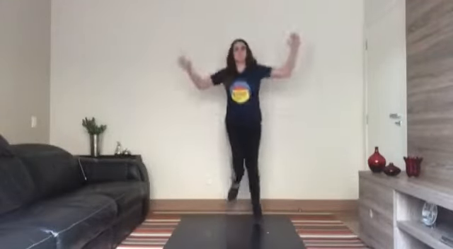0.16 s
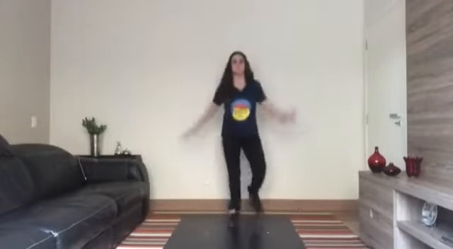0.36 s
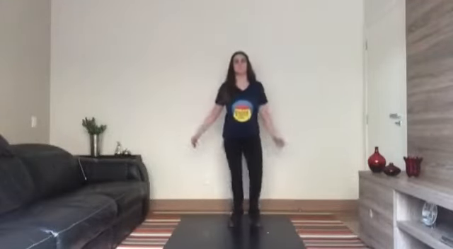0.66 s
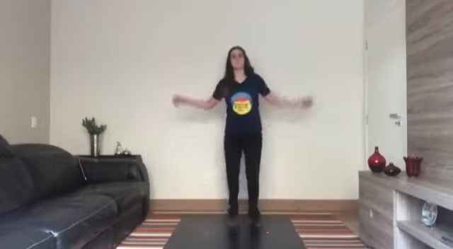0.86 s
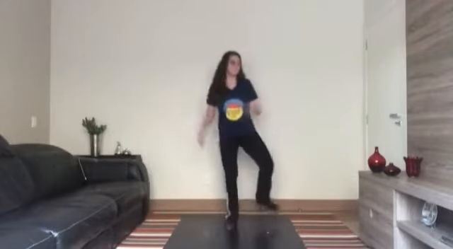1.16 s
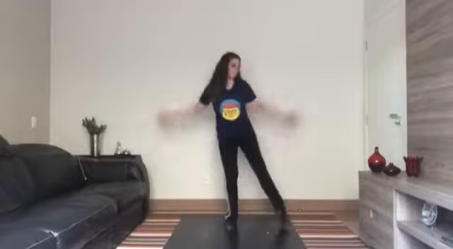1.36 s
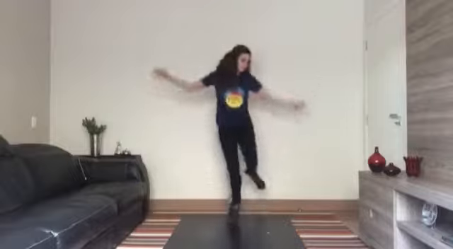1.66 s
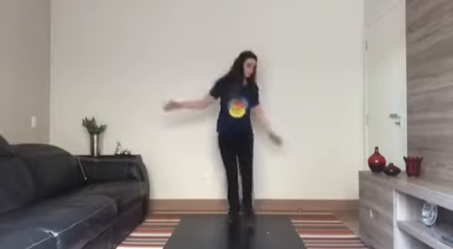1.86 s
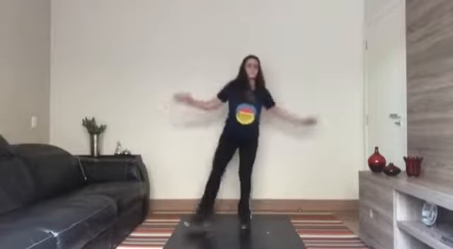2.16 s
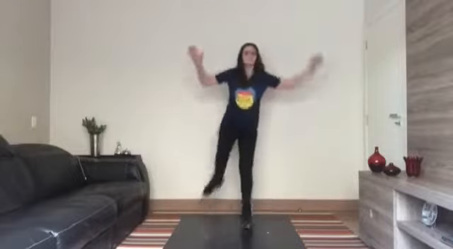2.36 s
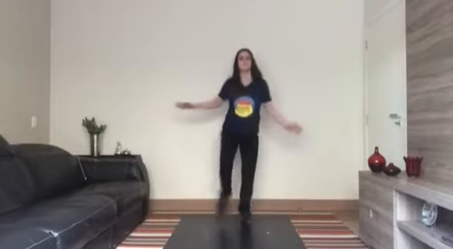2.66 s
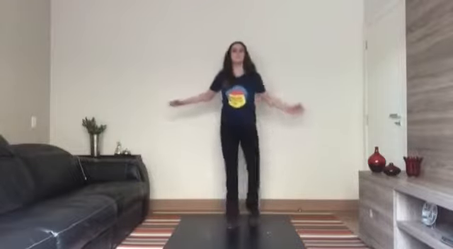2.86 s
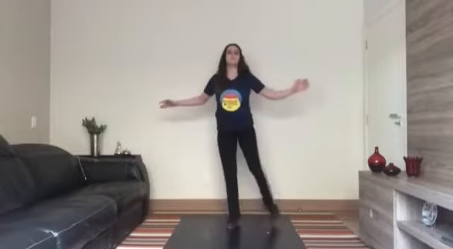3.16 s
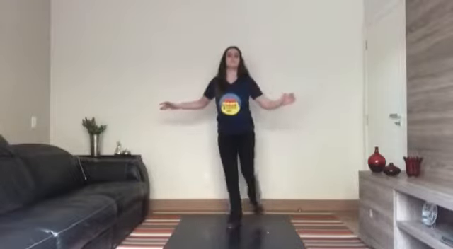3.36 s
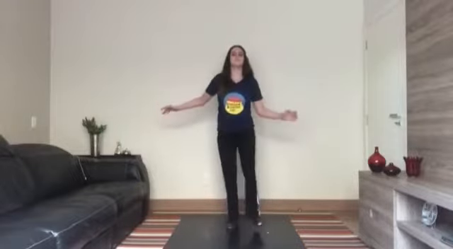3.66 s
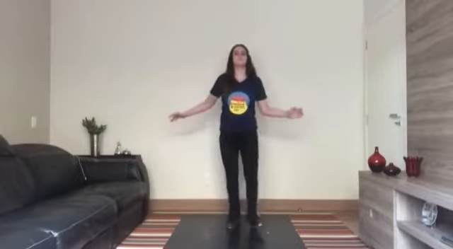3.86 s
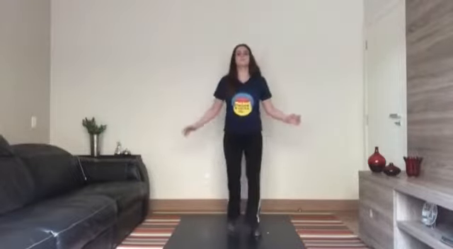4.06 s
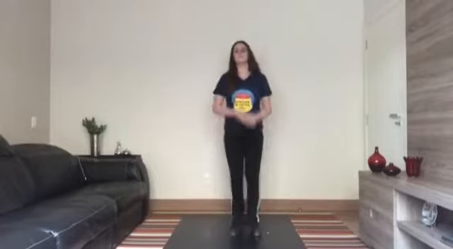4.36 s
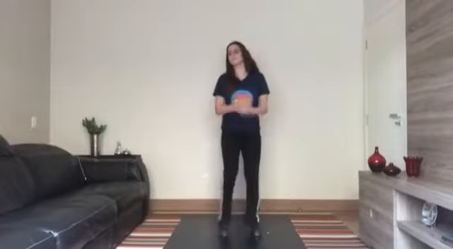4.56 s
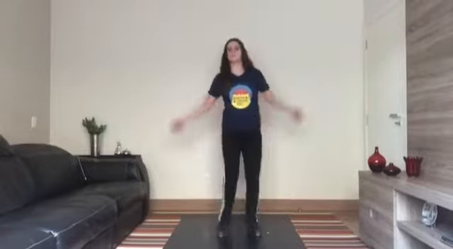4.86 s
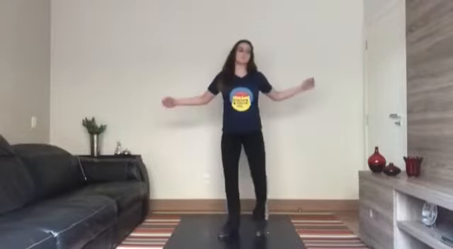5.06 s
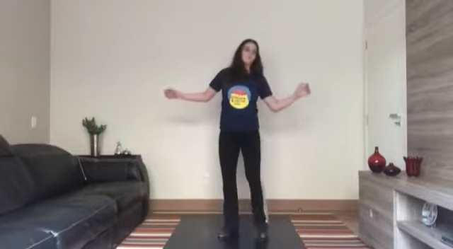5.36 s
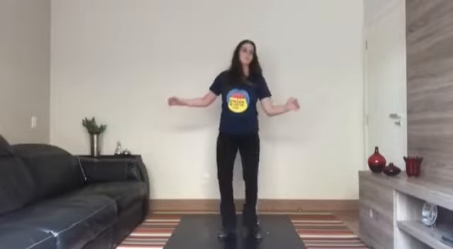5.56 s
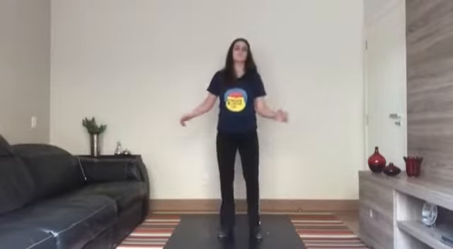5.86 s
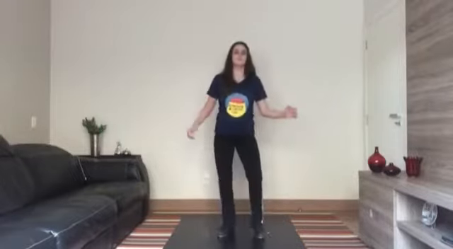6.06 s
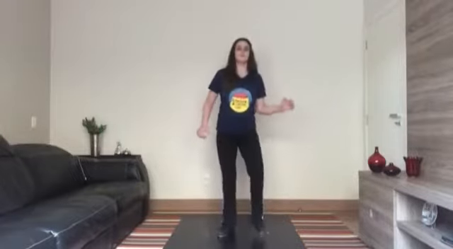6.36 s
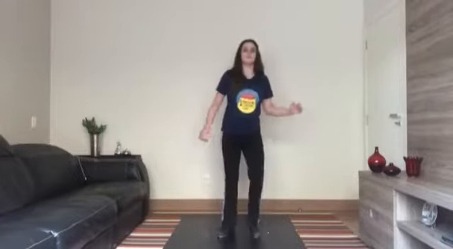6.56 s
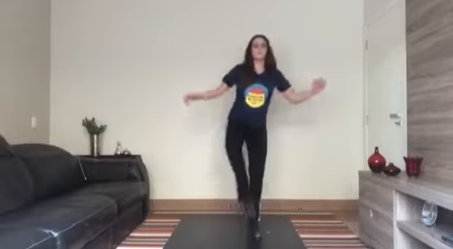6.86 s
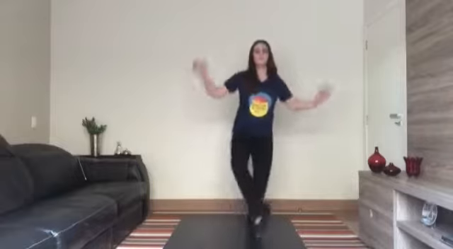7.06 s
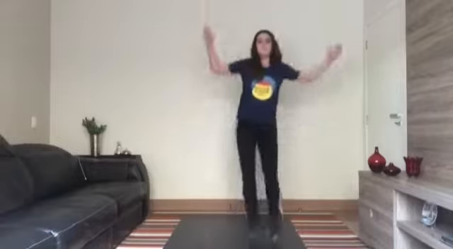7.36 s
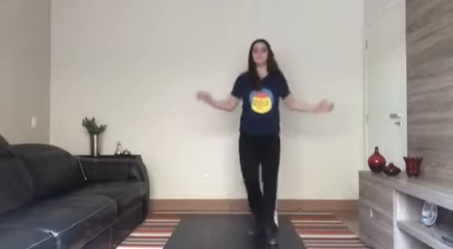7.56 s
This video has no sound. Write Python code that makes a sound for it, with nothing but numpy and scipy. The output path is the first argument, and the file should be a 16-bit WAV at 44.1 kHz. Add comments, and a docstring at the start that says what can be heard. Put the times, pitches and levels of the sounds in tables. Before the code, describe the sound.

A tap dancer in a bare living room strikes a wooden board with metal-plated shoes. Irregular opening taps and a heavy stomp lead to a rapid, steady run, which grows lighter, then ends in firm knocks. After a brief gap come sparser, softer taps and a few strong final landings. One microphone a few metres away catches plenty of room echo over a faint hush and low hum.

```python
"""A bare, echoing living room: metal-plated shoes tap on a wooden board, a few metres from one microphone.
Each tap briefly rings the board, the sole and the metal plate, built from resonances with random variation.
The room answers with a few early echoes and a long dying wash of noise, with standing waves in the bass.
Heavy landings also swing the floor in decaying low tones.
Faint filtered noise and a low machine hum stay underneath."""
import sys
import numpy as np
from scipy import signal
from scipy.fft import rfft, irfft
from scipy.io import wavfile
from scipy.ndimage import uniform_filter1d

SR = 44100
rng = np.random.default_rng(int(sys.argv[2]) if len(sys.argv) > 2 else 0)


def bounce(signal):
    """Save signal as a 16-bit WAV file at the path given by the first command-line argument."""
    frames = np.transpose(np.atleast_2d(signal))
    limited = np.clip(frames, -1, 1)
    pcm = np.round(limited * 32767).astype(np.int16)
    wavfile.write(sys.argv[1], SR, pcm)


N = 339570  # length in samples
TAP_SIZE = 32768  # samples in one room answer


def gain_of(db):
    """Turn decibels into an amplitude factor."""
    return 10 ** (np.asarray(db) / 20)


def read(points, hz):
    """Read a curve of (f/Hz, value) points, evenly spread over log frequency."""
    f, value = np.transpose(points)
    return np.interp(np.log(hz + 1), np.log(f + 1), value)


def add(mix, s, sound):
    """Add a sound to the mix, starting at s seconds."""
    part = mix[round(s * SR):][:len(sound)]
    part += sound[:len(part)]


def smooth_noise(shape, size, axis=-1):
    """Random values averaged with their neighbours, scaled back to their first spread."""
    return uniform_filter1d(rng.standard_normal(shape), size, axis) * np.sqrt(size)


def causal(power):
    """Spectrum of the shortest click that has this power spectrum (minimum phase)."""
    cepstrum = irfft(np.log(power + 1e-14) / 2)
    half = len(cepstrum) // 2
    cepstrum[1:half] *= 2
    cepstrum[half + 1:] = 0
    return np.exp(rfft(cepstrum))


def ring(modes, hz, luck):
    """Power spectrum of steep resonances at a fixed total; the spot struck favours some modes."""
    power = 0
    for k, (f, width, db) in enumerate(modes):
        mode_hz = f * (1 + .015 * luck[k])
        mode_db = db + 1.5 * luck[k + 6]
        off = (hz - mode_hz) / width
        power = power + gain_of(2 * mode_db) / (1 + 1.2 * off ** 2) ** 3
    return power / (2 * power.mean())


def plate_ping(plate_hz):
    """The metal plate heard straight: two tones that swell and die within milliseconds."""
    t = np.arange(600) / SR
    pair = np.sin(2 * np.pi * plate_hz * t) + 0.46 * np.sin(2 * np.pi * 1.235 * plate_hz * t)
    return pair * (t / 0.00068) * np.exp(1 - t / 0.0012)


def board_rap(knock_hz):
    """The board's knock heard straight: a short tone that starts sharp and settles."""
    t = np.arange(600) / SR
    bent_time = t + 0.00053 * (1 - np.exp(-t / 0.0011))
    return np.sin(2 * np.pi * knock_hz * bent_time) * np.exp(-t / .004)


# What each part rings with: f/Hz, width/Hz, level/dB (within its part)
BOARD_BOOM = [(141, 32, -20), (165, 20, -9), (220.4, 19, -7.5), (263.2, 90, 0), (363, 51, -5.5)]
BOARD_KNOCK = [(463, 210, 3), (652, 133, 2), (770, 230, 4.5), (936, 370, 3), (1152, 560, -4)]
SOLE_SLAP = [(1660, 1030, -1.4), (1914, 860, -1), (2440, 550, 0.12)]
UPPER_PLATE = [(5030, 940, 3), (6190, 980, -2)]
EDGE_TICK = [(6940, 2700, 14.4), (10480, 1270, 2.5)]
# Side rings of the plate: f as a ratio to the plate's pitch, width/Hz, level/dB
PLATE_SIDES = [(.86, 550, -5.5), (1.13, 490, -7)]
KNOCK_HZ, KNOCK_LEAN_DB = 806, 34  # usual knock pitch; lean in dB per octave squared
UPPER_DB, UPPER_FROM_SLAP = 1, 0.43  # upper plate ring: 43 % of the way from tick to slap level, plus 1 dB
PARTIALS_DB = 2


def blow(tap, luck):
    """The strike: board, sole and plate resonances add their power into one short click."""
    _, plate_db, plate_hz, tick_db, slap_db, knock_db, knock_hz, boom_db = tap
    hz = np.fft.rfftfreq(8192, 1 / SR)
    # a knock above the usual pitch favours the upper modes, one below it the lower
    lean_db = KNOCK_LEAN_DB * np.log2(knock_hz / KNOCK_HZ)
    knock = [(f, width, db + lean_db * np.log2(f / KNOCK_HZ)) for f, width, db in BOARD_KNOCK]
    knock.append((knock_hz, 350, -1.5))
    plate = [(plate_hz, 990, 0)]
    plate += [(ratio * plate_hz, width, db) for ratio, width, db in PLATE_SIDES]
    upper_db = tick_db + UPPER_DB + UPPER_FROM_SLAP * (slap_db - tick_db)

    parts = (BOARD_BOOM, knock, SOLE_SLAP, plate, UPPER_PLATE, EDGE_TICK)
    levels = (boom_db, knock_db, slap_db, plate_db, upper_db, tick_db)
    power = sum(gain_of(2 * db) * ring(modes, hz, u) for modes, db, u in zip(parts, levels, luck))
    # many small partials make the spectrum uneven, less so in the bass
    partials = smooth_noise(len(hz), 12) * hz / (hz + 400)
    return irfft(causal(power * gain_of(2 * PARTIALS_DB * partials)))


# Straight sound against the wash: f/Hz, level/dB
STRAIGHT = [(200, -18), (800, -23), (3000, -14.5), (9000, -18.5)]


def straight_sound(count, hz):
    """The plate meets the wood in tiny steps: a very short burst of noise for each tap."""
    t, contact_s = np.arange(400) / SR, 0.00037
    chatter = rng.standard_normal((count, 400)) * t * np.exp(-t / contact_s)
    chatter /= np.linalg.norm(chatter, axis=1)[:, None]
    return np.sqrt(SR / 10) * gain_of(read(STRAIGHT, hz)) * rfft(chatter, 2 * TAP_SIZE)


# Standing waves between the walls: f/Hz, level/dB (among themselves)
STANDING = [(176, -7.5), (223, 3), (284, 5), (314, -1), (372, -1.5), (663, -5), (790, -3.5)]


def standing_waves(count):
    """Tones the room itself rings with, fading together; each tap excites them differently."""
    t = np.arange(TAP_SIZE) / SR
    f, db = np.transpose(STANDING)
    strength = 0.63 + 0.88 * rng.standard_normal((count, len(f)))
    # each tap gets its own small random detuning of these tones
    pitch = f * (1 + .02 * rng.standard_normal((count, len(f))))
    amplitude = 0.041 * gain_of(db) * strength
    tones = [a @ np.sin(2 * np.pi * p[:, None] * t) for a, p in zip(amplitude, pitch)]
    return np.array(tones) * np.exp(-t / 0.26)


# How fast the main wash dies: f/Hz, time to fall 60 dB/s
WASH_DECAY = [(130, 0.56), (260, 0.64), (700, 0.73), (1800, 0.85), (4500, 0.69), (8000, 0.53),
              (12000, 0.41)]
# How slowly the wash builds: f/Hz, time constant/s
WASH_BUILD = [(250, 0.007), (800, 0.0028), (3000, 0.0083), (9000, 0.0069)]
ALIKE, PATCHY_DB = 0.51, 2.0  # share of noise common to all taps; unevenness of the wash
LATE_DB, LATE_STRETCH = -18, 2.65  # the second slope: its level and how many times longer it lasts
LATE_LIFT_DB = 0.5  # treble lift of the second slope, per 5000 Hz
DIFFUSE_HZ, DIFFUSE_DB = 415, -1.5  # below this pitch the noise gets softer and smoother


def room_wash(count):
    """Noise that builds and dies band by band, like countless reflections, over the standing waves."""
    shared, own = rng.standard_normal(TAP_SIZE), rng.standard_normal((count, TAP_SIZE))
    noise = ALIKE * shared + np.sqrt(1 - ALIKE ** 2) * own
    hz, t, bands = signal.stft(noise, SR, nperseg=256)
    high = (1 / (1 + (DIFFUSE_HZ / (hz + 1)) ** 4))[:, None]
    bands = bands * gain_of(DIFFUSE_DB * (1 - high))
    bands = bands + signal.stft(standing_waves(count), SR, nperseg=256)[2]

    rise = 1 - np.exp(-t / np.maximum(read(WASH_BUILD, hz), .001)[:, None])
    fall_db = -60 * t / read(WASH_DECAY, hz)[:, None]
    # a quieter second slope dies more slowly, so the tail lingers
    late_db = LATE_DB + LATE_LIFT_DB * hz[:, None] / 5000 + fall_db / LATE_STRETCH
    shape = rise * np.hypot(gain_of(fall_db), gain_of(late_db))
    shape /= shape.max(1)[:, None]

    # louder and softer patches over neighbouring pitches and moments
    patches = uniform_filter1d(smooth_noise(bands.shape, 5, 1), 9, 2) * np.sqrt(9)
    bands = bands * shape * gain_of(high * PATCHY_DB * patches)
    return signal.istft(bands, SR, nperseg=256)[1][:, :TAP_SIZE]


# First surfaces, the far ones hard and favouring the treble: t/s, level/dB, lift above 5 kHz/dB
FIRST_ECHOES = [(.0048, 3, -9), (.0145, -12, 17.5), (.0175, -11, 20)]


def first_echoes(count, hz):
    """Delayed copies of the straight sound, with alternating sign; includes the straight path."""
    early = np.ones((count, len(hz)), complex)
    bright = 1 / (1 + (5000 / (hz + 1)) ** 4)
    luck = rng.standard_normal((count, len(FIRST_ECHOES), 2, 1))
    for k, (s, db, lift_db) in enumerate(FIRST_ECHOES):
        # each echo's delay varies slightly at random from tap to tap
        delay = s + 0.00049 * luck[:, k, 0]
        gain = gain_of(db + lift_db * bright + 2 * luck[:, k, 1])
        early += (-1) ** k * gain * np.exp(-2j * np.pi * hz * delay)
    return early


def room(count):
    """Spectrum of the room's answer to each tap: straight sound, first echoes and dying wash."""
    hz = np.fft.rfftfreq(2 * TAP_SIZE, 1 / SR)
    early = straight_sound(count, hz) * first_echoes(count, hz)
    return rfft(room_wash(count), 2 * TAP_SIZE) + early


# Taps: t/s, plate click level/dB, plate f/Hz, edge tick level/dB, sole slap level/dB,
# board knock level/dB, knock f/Hz, board boom level/dB
TAP_LIST = [(-0.15, -15.0, 3250, -25.5, -17.5, -9, 765, -15),
            (0.015, -27, 3030, -39.0, -21.0, -29.0, 780, -21),
            (0.141, -19.5, 3510, -32.0, -23, -25, 720, -19.5),
            (0.308, -19, 3600, -30, -19.0, -13, 840, -19.5),
            (0.466, -20, 3370, -28, -21.5, -16.0, 865, -21.5),
            (0.665, -18.5, 4450, -27.0, -28, -16.5, 700, -18.5),
            (1.108, -20.5, 3690, -25.0, -20.5, -11.5, 730, -18),
            (1.252, -20, 3330, -24.5, -18, -13.5, 810, -20), (1.402, -18, 3360, -23.5, -20, -15, 780, -21),
            (1.574, -23.5, 2960, -31, -23, -23.5, 774, -25),
            (1.694, -19, 3240, -28.5, -19.5, -15.5, 794, -23),
            (1.863, -23.5, 3750, -34.5, -20.5, -15, 950, -19.5),
            (2.034, -28.5, 3130, -35, -28.0, -29, 700, -25), (2.132, -22.5, 3260, -30, -19, -17, 720, -20),
            (2.267, -17.5, 3310, -26.0, -16, -13.5, 740, -17.0),
            (2.436, -23.5, 3600, -31, -25.0, -29, 830, -20.5),
            (2.574, -19, 3600, -25.5, -19, -16.5, 805, -24.5),
            (2.727, -29, 3300, -38.5, -26, -14.5, 895, -18.5),
            (2.868, -25.0, 3370, -38.0, -23.0, -19, 826, -24.5),
            (3.0, -25, 3190, -32, -24.5, -16.5, 804, -23.5),
            (3.138, -21.5, 3360, -25.5, -21.5, -15.5, 820, -25),
            (3.25, -25, 3430, -37.5, -35.0, -24, 745, -22.0),
            (3.42, -24.0, 3470, -32.5, -24, -13.5, 890, -22.5),
            (3.542, -28.5, 3970, -34.5, -55, -19, 765, -28.5),
            (3.724, -28.5, 2950, -41, -43, -27.0, 685, -26.5),
            (3.883, -31.5, 3240, -48, -46, -27.5, 640, -21),
            (3.994, -21.0, 3120, -22.5, -18, -23, 920, -13.5),
            (4.181, -19, 3850, -26.5, -18, -14.0, 805, -15.0),
            (4.653, -18, 3930, -28.5, -28.5, -15, 780, -18.5),
            (4.971, -27.5, 4080, -37.5, -36, -22, 790, -26.5),
            (5.16, -24.5, 3480, -26.5, -39, -17.5, 730, -20.0),
            (5.347, -28, 3600, -48.5, -36.5, -24, 756, -23.5),
            (5.504, -25.5, 3600, -36, -39.0, -24.5, 834, -20.5),
            (5.68, -29.0, 3300, -41.5, -42.0, -26, 715, -24.5),
            (5.813, -36.0, 3700, -41.5, -42, -28, 804, -24.5),
            (5.962, -30, 4340, -38.0, -35, -21.5, 810, -26.5),
            (6.103, -31, 3450, -37, -26.5, -31, 790, -33),
            (6.132, -25.5, 3140, -38.0, -41, -23.0, 783, -21.5),
            (6.601, -23.5, 3060, -31, -19.5, -20.5, 850, -18),
            (6.912, -28.5, 3230, -40.5, -26, -31.5, 770, -27),
            (6.975, -46, 3230, -50.0, -42, -30.5, 754, -20.5),
            (7.112, -28, 3520, -34.0, -22, -9.5, 910, -14),
            (7.426, -29.0, 3120, -36.0, -23, -23.0, 755, -25),
            (7.606, -24.5, 3400, -19.5, -20.5, -17, 794, -15),
            (7.634, -26, 4770, -29, -22.0, -10.5, 850, -17)]
PING_DB, RAP_DB, FLAT_DB = 1, 3, 18


def taps():
    """Every tap drives board, sole and plate with its own strengths, and the room answers."""
    out = np.zeros(N + SR)  # one spare second in front, for the tap before the start
    count = len(TAP_LIST)
    luck = rng.standard_normal((count, 6, 12))
    for tap, u, answer in zip(TAP_LIST, luck, room(count)):
        s, plate_db, plate_hz, _, _, knock_db, knock_hz, _ = tap
        ping = gain_of(plate_db + PING_DB) * plate_ping(plate_hz)
        # the rap is held back unless the knock outweighs the plate by FLAT_DB
        held_back_db = min(knock_db - plate_db - FLAT_DB, 0)
        rap = gain_of(RAP_DB + knock_db + held_back_db) * board_rap(knock_hz)
        add(out, s + 1, ping + rap)
        in_room = irfft(rfft(blow(tap, u), 2 * TAP_SIZE) * answer)
        add(out, s + 1, in_room[:TAP_SIZE + TAP_SIZE // 4])
    return out[SR:]


# Noise colour before a further treble cut: f/Hz, level/dB (relative, per Hz)
HUSH_COLOUR = [(30, -10), (45, -28), (62, -7), (250, -41), (1000, -34), (4000, -22)]
HUSH_DB, HUM_HZ, HUM_DB = -55, 45, -56.5


def hush():
    """Faint steady noise of the house, shaped by filtering, with a low machine hum as a pure tone."""
    hz = np.fft.rfftfreq(N, 1 / SR)
    colour = gain_of(read(HUSH_COLOUR, hz)) / (1 + (hz / 5000) ** 4)
    noise = irfft(rfft(rng.standard_normal(N)) * colour, N)
    hum = np.sqrt(2) * np.sin(2 * np.pi * (HUM_HZ * np.arange(N) / SR + rng.random()))
    return gain_of(HUSH_DB) * noise / noise.std() + gain_of(HUM_DB) * hum


# Low tones of the floor: f/Hz, width/Hz (wider dies faster), level/dB (among themselves)
FLOOR_TONES = [(68.4, 9.4, 4), (84, 6.8, 5), (103.6, 12, -2)]
# Heavy landings, felt once the weight is down: t/s, level/dB
LANDINGS = [(.33, -38), (1.13, -22), (4.026, -32), (4.21, -29.5), (4.676, -28), (5.187, -38), (5.529, -41),
            (5.988, -37), (6.161, -38.5), (7.135, -34), (7.648, -29.5)]


def stomps():
    """Heavy landings shake the floor, which swings at its own low tones and dies away."""
    out, t = np.zeros(N), np.arange(SR // 2) / SR
    onset = 1 - np.exp(-t / 0.011)
    for s, db in LANDINGS:
        swing = np.zeros(len(t))
        for f, width, tone_db in FLOOR_TONES:
            gain = gain_of(tone_db + 2 * rng.standard_normal())
            swing += gain * np.exp(-np.pi * width * t) * np.sin(2 * np.pi * f * t)
        add(out, s, gain_of(db) * onset * swing)
    return out


def scene():
    """All layers together, the same in both channels."""
    return np.tile(taps() + hush() + stomps(), (2, 1))


def record(dry):
    """Loud peaks are rounded off; then the deep bass and the highest treble are cut."""
    soft = np.tanh(dry)
    bass_cut = signal.butter(6, 39, "high", fs=SR, output="sos")
    soft = signal.sosfilt(bass_cut, soft)
    treble_cut = signal.firwin(401, 11750, window=("kaiser", 9), fs=SR)
    return signal.oaconvolve(soft, treble_cut[None], "same")


dry = scene()
out = record(dry)
bounce(out)
```